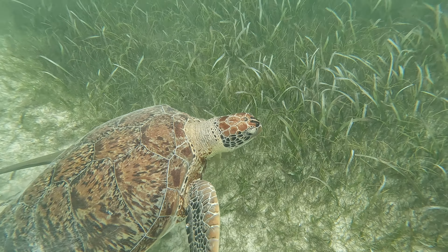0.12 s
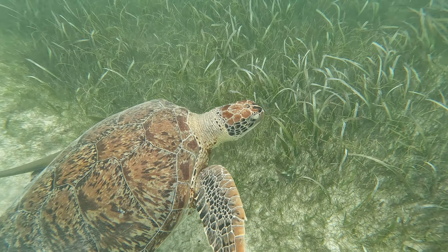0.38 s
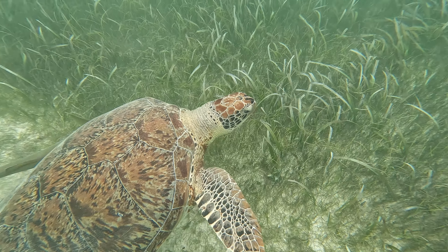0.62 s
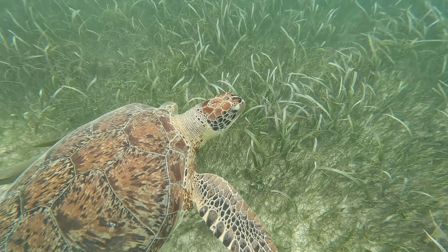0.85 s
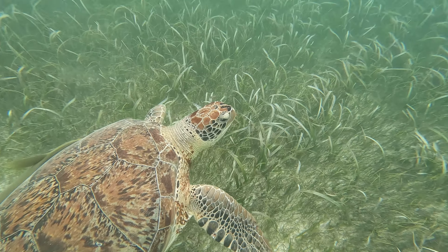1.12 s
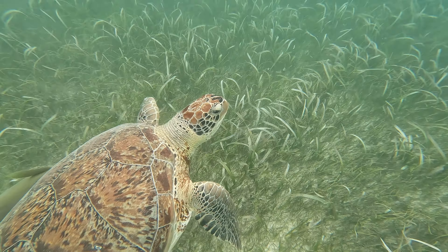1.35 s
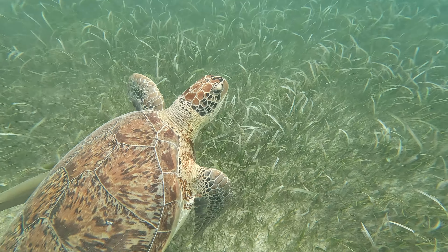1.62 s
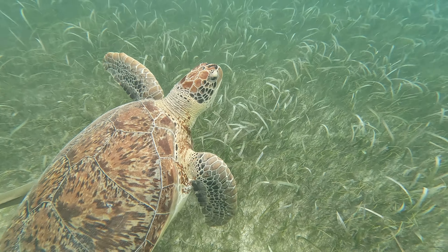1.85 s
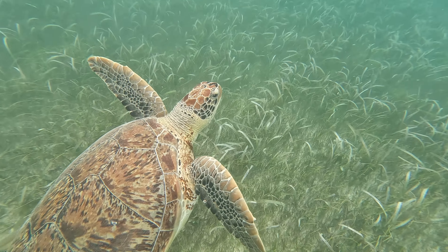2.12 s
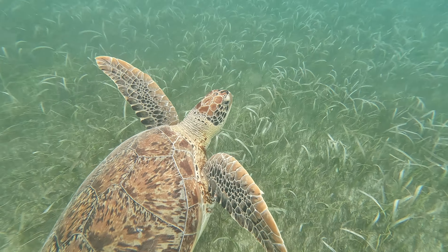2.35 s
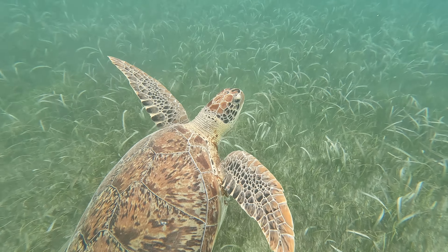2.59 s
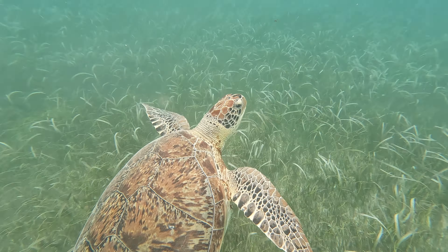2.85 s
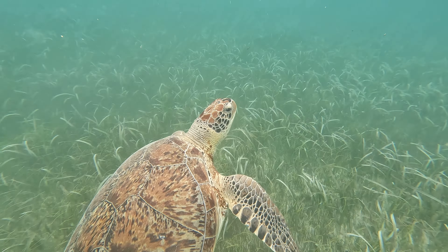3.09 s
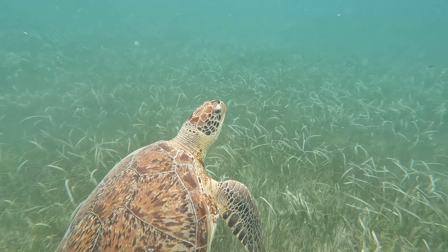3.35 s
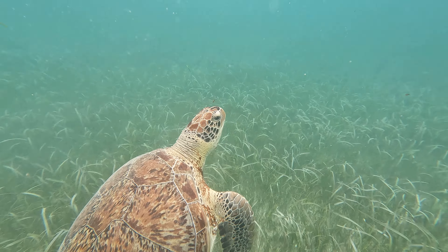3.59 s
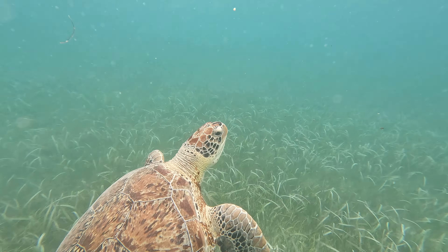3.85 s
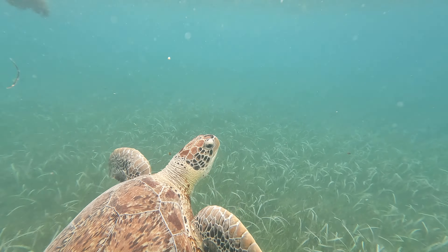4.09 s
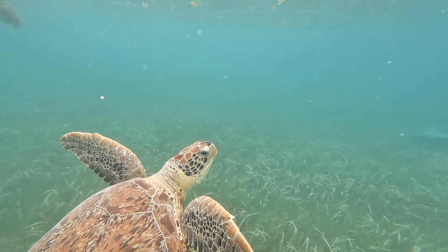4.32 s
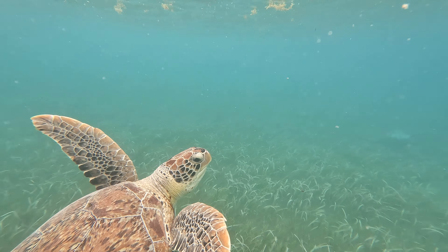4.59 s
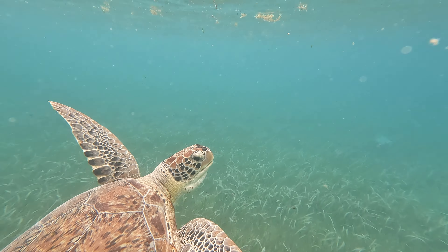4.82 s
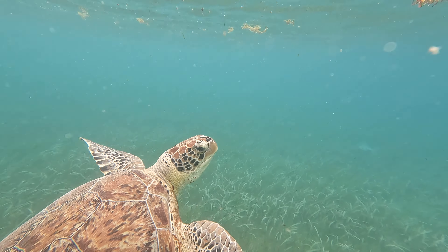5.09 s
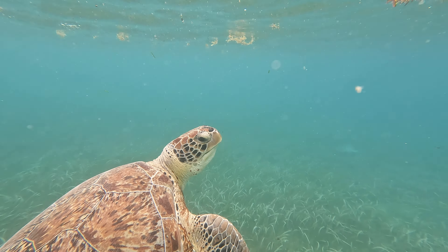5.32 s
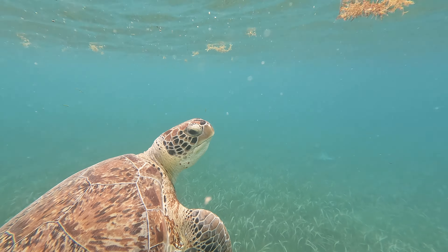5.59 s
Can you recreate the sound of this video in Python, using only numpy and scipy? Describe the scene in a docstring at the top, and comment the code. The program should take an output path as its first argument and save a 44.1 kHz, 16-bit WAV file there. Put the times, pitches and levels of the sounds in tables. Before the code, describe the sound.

Rapid muffled throbs, a short burst of crackling, plopping bubbles and splashy gurgles, then deep throbbing again, heard close and submerged.

```python
"""Bubbles are released underwater in a train of dull thumps: pressure dips that swing back.
A trapped pocket hums near 600 Hz as noise-driven resonance; single bubbles ping as gliding, dying sines.
Splashes, slosh and churn are filtered noise; fine bubbles crackle as random clicks through resonant bands.
From 1.95 s to 3.5 s the stereo image narrows to mono over most of the spectrum and the ticks of the
fine bubbles grow dull."""
import sys
import numpy as np
from scipy import signal
from scipy.fft import rfft, irfft
from scipy.io import wavfile
from scipy.ndimage import uniform_filter1d, map_coordinates

SR = 44100
rng = np.random.default_rng(int(sys.argv[2]) if len(sys.argv) > 2 else 0)


def digitize_waveform(pressure):
    """Quantize a signal to 16-bit integers and store it at the path in sys.argv[1].

    Rows of a 2-D input are taken as channels; values are limited to [-1, 1].
    """
    field = np.atleast_2d(pressure).T
    bounded = np.clip(field, -1, 1)
    quanta = np.round(bounded * 32767).astype(np.int16)
    wavfile.write(sys.argv[1], SR, quanta)


def ratio_of_db(decibels):
    """Turn decibels (scalar or array-like) into linear amplitude factors; 0 dB maps to 1."""
    return 10 ** (np.asarray(decibels, float) / 20)


N = 251370
T = np.arange(N) / SR


def thumps():
    """Pressure release: each thump dips, swings back in a longer, lower hump and excites two damped air modes."""
    # bubble thumps: trough_s, level_db
    thump_rows = [(0.0271, -10.5), (0.131, -17), (0.222, -10.5), (0.323, -7.5), (0.3432, -16.5),
                  (0.436, -13), (0.529, -13.5), (0.6232, -12.5), (0.729, -8), (0.831, -16), (0.851, -10.5),
                  (0.953, -12), (1.0545, -17.5), (1.156, -18.5), (1.7566, -11.5), (1.769, -16),
                  (1.811, -14.5), (2.749, -28), (3.2804, -12), (3.369, -7.5), (3.4286, -18.5),
                  (3.477, -8.5), (3.492, -16), (3.5763, -9), (3.5872, -13), (3.685, -12), (3.7517, -7),
                  (3.7668, -13), (3.866, -9.5), (3.8737, -21.5), (3.988, -7.5), (4.0802, -6.5),
                  (4.1505, -7.5), (4.2581, -9), (4.417, -11), (4.5294, -13), (4.6117, -6.5), (4.7183, -11),
                  (4.927, -7.5), (5.0165, -5), (5.1158, -7), (5.1382, -11.5), (5.254, -10), (5.35, -19),
                  (5.363, -24), (5.3968, -13), (5.429, -20), (5.55, -11.5), (5.664, -17)]
    modes = [(400, 39, -17.0), (590, 150, -30.5)]  # mode_hz, bandwidth_hz, mean_level_db
    out = np.zeros(N + SR)
    u = np.arange(-SR // 50, SR // 20) / SR  # seconds from the trough
    since_knock = np.maximum(u + 0.0017, 0)
    soft = np.convolve(np.hanning(40), np.hanning(40)) / 380
    wide = np.hanning(len(u))
    chances = rng.standard_normal((len(thump_rows), 4))
    for (s, db), (size, tail, *knocks) in zip(thump_rows, chances):
        w = u / (0.004186 * np.exp(0.13 * size))  # time in lengths of the dip; sizes vary at random
        dip = np.abs(np.cos(np.pi * np.clip(w, -.5, .5))) ** .6
        hump_phase = np.clip((w - .5) / (1.7 * np.exp(0.2 * tail)), 0, 1)
        hump = np.abs(np.sin(np.pi * hump_phase)) ** .2  # a low exponent flattens the top
        thump = 0.42 * hump - dip
        for (hz, width_hz, level_db), chance in zip(modes, knocks):
            decay = np.exp(-np.pi * width_hz * since_knock)
            thump = thump - ratio_of_db(level_db + 4 * chance) * decay * np.sin(2 * np.pi * hz * since_knock)
        balanced = thump - wide * thump.sum() / wide.sum()  # the pressure evens out
        out[round(s * SR):][:len(u)] += ratio_of_db(db) * np.convolve(balanced, soft, "same")
    return out[SR // 50:][:N]  # centred on the trough


def pocket(pings):
    """Driven resonance: turbulence excites a trapped air pocket at a moving pitch and a fixed lower mode."""
    # pitch of the trapped pocket: time_s, pitch_hz
    pocket_pitch = [(0, 548), (.45, 600), (1.25, 596), (1.5, 537.4), (2.0, 636.3), (2.9, 628.8), (3.3, 577),
                    (3.8, 582.8), (4.2, 558.7), (5.3, 563.9), (5.7, 494.2)]
    # hum before its random flutter and the bubbles' stirring: time_s, level_db
    hum_level = [(0, -24.5), (.8, -23.5), (1.24, -27.5), (1.3, -41.5), (1.4, -47.5), (1.47, -33.5),
                 (1.68, -27.5), (1.9, -52.5), (2.2, -35), (2.6, -42.5), (3.09, -45), (3.15, -29),
                 (3.82, -25), (3.87, -37), (4.0, -35), (4.04, -25.5), (4.72, -32), (5.04, -22.5),
                 (5.1, -43), (5.15, -25), (5.4, -44.5), (5.7, -29.5)]
    phase = 2 * np.pi * np.cumsum(curves(pocket_pitch, T)[0]) / SR
    low_phase = 2 * np.pi * 478 * T
    t = T[:SR // 8]
    hum = 0
    for turning, width_hz, db in [(phase, 40, 1), (low_phase, 32, -6.5)]:
        stir = rng.standard_normal((2, N)).T @ [1, 1j]
        envelope_filter = t * t * np.exp(-3 * np.pi * width_hz * t)  # steep skirts
        swing = signal.fftconvolve(stir, envelope_filter)[:N]
        hum = hum + ratio_of_db(db) * unit((swing * np.exp(1j * turning)).real)
    # bubbles close to the pocket's pitch set it humming
    near_pings = signal.lfilter(*signal.iirpeak(620, 10, SR), pings)
    near = uniform_filter1d(np.abs(near_pings), size=900)
    strength = ratio_of_db(curves(hum_level, T)[0]) + ratio_of_db(-9) * near
    return strength * ratio_of_db(1.2 * wobble(25)) * unit(hum)


def bubbles():
    """Damped bubble oscillation: each bubble is a dying sine whose pitch slides as it changes size."""
    # single bubbles before eddies disturb level and pitch: start_s, level_db, start_hz, end_hz, t60_s
    bubble_rows = [(.02, -22.5, 178.6, 155, 0.37), (0.673, -15.5, 1520, 1390, 0.057),
                   (1.10, -28, 1580, 1690, 0.054), (1.464, -20.5, 1743, 1940, 0.035),
                   (1.52, -20.5, 1953, 1886, 0.081), (1.648, -23.5, 1453, 1226, 0.12),
                   (1.716, -22.5, 1017, 990, 0.087), (1.734, -11.5, 496, 445, 0.063),
                   (1.791, -26.5, 1295, 1320, 0.14), (1.804, -3.5, 365, 476, 0.035),
                   (1.836, -22, 987, 1035, 0.13), (1.855, -23, 1210, 1270, 0.078),
                   (1.869, -23.5, 1690, 1730, 0.037), (1.944, -23, 1890, 1810, 0.03),
                   (1.95, -29, 300, 365, 0.81), (2.07, -27.5, 450, 503, 0.47),
                   (2.251, -43.5, 4260, 4500, 0.042), (2.301, -16.5, 510, 626, 0.19),
                   (2.32, -11, 625.6, 479, 0.22), (2.45, -11, 656.5, 700, 0.11),
                   (2.678, -7, 359, 400, 0.15), (2.696, -3.5, 626, 578, 0.11),
                   (2.744, -19, 277.2, 516.6, 0.42), (2.806, -20.5, 804, 994, 0.12),
                   (2.812, -20.5, 621, 627, 0.19), (2.864, -5.5, 552, 625, 0.063),
                   (2.883, -4, 610, 652, 0.11), (4.195, -29, 1057, 1020, 0.12),
                   (2.945, -28.5, 463, 540, .15), (4.345, -11.5, 590, 570, 0.19),
                   (4.575, -10.5, 564, 544, 0.15), (4.648, -12, 575.5, 560, 0.18),
                   (2.9, -31.5, 1310, 1330, 0.037), (5.572, -27, 388.7, 498, 0.6),
                   (5.54, -21.5, 1348, 1283, 0.058), (5.666, -9, 385, 478, 0.045)]
    out, t = np.zeros(N + SR), T[:SR // 2]
    eddies = np.pad([wobble(100), wobble(90)], ((0, 0), (0, SR)))  # passing eddies break the tones up
    for k, (s, db, start_hz, end_hz, t60) in enumerate(bubble_rows):
        flutter, waver = eddies[:, k * N // len(bubble_rows):][:, :len(t)]  # each bubble meets its own
        glide = np.minimum(t / (0.42 * t60), 1)
        hz = (start_hz + (end_hz - start_hz) * glide) * (1 + .018 * waver)
        swell_s = min(0.054 * t60, 0.0092)
        swell = 1 - np.exp(-(t / swell_s) ** 2)
        shape = swell * ratio_of_db(db - 60 * t / t60 + 2.2 * flutter)
        out[round(s * SR):][:len(t)] += shape * np.sin(2 * np.pi * np.cumsum(hz) / SR)
    return out[:N]


def splashes():
    """Turbulent noise burst: a splash sets in fast, boils and dies; returns its strength and its sound."""
    # rough splashes: start_s, level_db, decay_ms
    splash_rows = [(1.461, -28.5, 19.5), (1.629, -29.5, 19), (1.728, -36.5, 32), (2.023, -28.5, 32),
                   (2.293, -33.5, 76), (2.42, -30, 81), (2.63, -23, 61.5), (2.808, -35.5, 33),
                   (2.252, -37, 6.9)]
    # relative splash spectrum: frequency_hz, level_db
    splash_colour = [(150, -45), (350, -3), (700, 6.5), (1100, -7.5), (2100, -16.5), (2450, -42.5),
                     (3000, -48), (7000, -110)]
    shape = 0
    for s, db, ms in splash_rows:
        onset = np.clip((T - s) / 0.0019, 0, 1)
        decay = np.exp(-(np.maximum(T - s, 0) / ms * 1000) ** 3)
        shape = shape + ratio_of_db(db) * onset * decay
    boil = ratio_of_db(3.5 * wobble(70)) * grains(1100, spread_db=0.0, bed=0.99)
    return shape, coloured(shape * boil, splash_colour)


def crackle(splashing):
    """Impulse excitation of resonances: fine bubbles, snaps and pips ring filter bands; also returns fizz."""
    # fine bubbles: time_s, level_db
    fizz_level = [(0, -45), (1.2, -46.5), (1.42, -45), (1.46, -35.5), (1.55, -36.5), (1.6, -41.5),
                  (1.8, -39.5), (1.84, -50.5), (2.3, -48.5), (2.41, -59.5), (2.43, -47), (2.47, -41.5),
                  (2.5, -59), (2.6, -54), (2.72, -67.5), (2.85, -74), (2.95, -91.5)]
    # single snaps: time_s, level_db, knock_over_snap_db
    snap_rows = [(0.067, -9, -4.5), (1.2792, 1, -9.5), (1.3293, -8.5, -3.5), (1.4306, -6.5, -3),
                 (1.638, -8, -20), (1.683, -0.5, -20), (1.711, -1.5, -13), (1.764, -4.5, -25),
                 (1.811, -3.5, 4), (1.9981, -7, -2), (2.16, -3.5, 5.5), (2.686, -27.5, 33),
                 (2.748, -43, 34), (5.542, -40, 34.5)]
    # bright ticks of single tiny bubbles: time_s, level_db
    pip_rows = [(0.0404, -20.5), (0.2693, -23), (0.414, -29), (0.6484, -21.5), (0.9995, -20.5),
                (1.9264, -29), (2.1575, -29), (2.297, -40), (2.3306, -41)]
    # relative spectra of resonant body, bright tick and low knock: frequency_hz, level_db
    body_colour = [(650, -21.5), (1100, -13.5), (1150, -15), (1380, -10), (1510, -11), (1890, 0),
                   (2110, -12.5), (2500, -45), (5500, -120)]
    tick_colour = [(1500, -46.5), (2450, -27.5), (2620, -11.5), (2900, 2.5), (3280, -9.5), (3700, -4),
                   (4320, -19.5), (5300, -31), (9000, -90.5)]
    knock_colour = [(300, -30), (650, -2), (1400, -24.5), (2300, -45.5), (5000, -110)]
    # tick of the fine bubbles over their crackle: wide_db, narrow_db
    bright_ends = (-16, -39)
    crackle_db, = curves(fizz_level, T)
    fizz = unit(grains(1200, spread_db=4.5, bed=.7) * ratio_of_db(1.5 * wobble(60) + 1.6 * wobble(18)))
    s, db, knock_db = np.transpose(snap_rows)
    body = coloured(ratio_of_db(crackle_db) * fizz + spikes(s, db), body_colour)
    bursts = ratio_of_db(crackle_db + 1.7 * wobble(14)) + 0.13 * splashing  # splashes stir the fizz
    bursts = bursts * ratio_of_db(narrowed(bright_ends, T))
    bright = fizz + 0.57 * swarm(count=2600, low_hz=2738, high_hz=4600, cycles=6.2)
    singles = spikes(s, db - 34) + spikes(*np.transpose(pip_rows))
    tick = coloured(bursts * bright + singles, tick_colour)
    knock = coloured(spikes(s, db + knock_db), knock_colour)
    return body + tick + knock, fizz, crackle_db


def spray_and_blips(crackle_db):
    """Size-dependent bubble pitch: lively fizz throws the finest bubbles and carries larger ones."""
    # relative spectrum of the finest bubbles: frequency_hz, level_db
    spray_colour = [(3500, -49), (4600, -7.5), (5500, -5.5), (7000, 6), (7800, -5.5), (11000, -89.5)]
    strength = ratio_of_db(1.605 * crackle_db - 9.5) * ratio_of_db(3.7 * wobble(7.5))
    spray = coloured(strength * grains(300, spread_db=3.5, bed=0.82), spray_colour)
    blips = ratio_of_db(1.51 * crackle_db + 16) * swarm(count=950, low_hz=700, high_hz=2300, cycles=12)
    return spray + blips


def gurgle(fizz, gurgle_db):
    """Resonant filtering: grains and small bubbles gurgle with a fluctuating level."""
    # relative gurgle spectrum: frequency_hz, level_db
    gurgle_colour = [(360, -16.5), (620, -7.5), (645, -0.5), (825, -15), (878, -18), (1070, -11),
                     (1160, -21.5), (1370, -15.5), (1430, -16.5), (1590, -42), (1800, -40), (2340, -64.5),
                     (3960, -120)]
    wash = fizz + grains(570, spread_db=3.0, bed=0.71)
    wash = wash + 0.31 * swarm(count=500, low_hz=700, high_hz=1427, cycles=10)
    return ratio_of_db(gurgle_db + 3.2 * wobble(22)) * unit(coloured(wash, gurgle_colour))


def slosh(rumble_db):
    """Low-frequency flow noise: moving water rumbles with a fluctuating level."""
    # relative slosh spectrum: frequency_hz, level_db
    slosh_colour = [(10, 8.5), (30, 12.5), (60, 2.5), (120, -7.5), (900, -120)]
    return ratio_of_db(rumble_db + 3.5 * wobble(25)) * coloured(rng.standard_normal(N), slosh_colour)


def churn(churn_db):
    """Band-shaped turbulence noise: churning water fluctuates in level."""
    # relative churn spectrum: frequency_hz, level_db
    churn_colour = [(60, -27.5), (130, 0), (210, 1.5), (270, -8), (420, -6.5), (520, 0), (1500, -110)]
    return ratio_of_db(churn_db + 3.0 * wobble(18)) * coloured(rng.standard_normal(N), churn_colour)


def faint_ticks(push):
    """Amplitude modulation: faint ticking noise swells with the thumps and varies in level."""
    # relative spectrum of the faint ticks: frequency_hz, level_db
    hiss_colour = [(1000, -41.5), (1600, -7.5), (2100, -2), (2600, -11.5), (3600, -15.5), (8000, -35),
                   (15000, -72.5)]
    swelling = 1 + 8 * ratio_of_db(2.5 * wobble(9)) * uniform_filter1d(np.abs(push), size=900)
    ticks = grains(280, spread_db=3.5, bed=.75) * ratio_of_db(2.5 * wobble(15) + 2.5 * wobble(4))
    return ratio_of_db(-72.5) * swelling * coloured(ticks, hiss_colour)


def stereo(mid):
    """Mid-side stereo: left and right are the mid signal plus and minus a filtered, phase-turned copy."""
    # phase turn from mid to side: frequency_hz, angle_rad
    phase_turn = [(40, 2.9), (170, 2.1), (340, 2), (560, 2.85), (720, 3.14), (860, 4.2), (1080, 4.07),
                  (1550, 4.8), (3000, 5.29), (4500, 5.7)]
    hz, t, z = signal.stft(mid, SR, nperseg=1024)
    # the side copy is full above a corner and falls below it; pairs are (wide image, narrow image)
    corner_hz = np.exp(narrowed(np.log((540, 4500)), t))
    fall_db_per_octave = narrowed((6.5, 42), t)
    least_db = narrowed((-11, -78.5), t)
    octaves = np.log2(np.minimum((hz[:, None] + 1) / corner_hz, 1))
    width = ratio_of_db(np.maximum(fall_db_per_octave * octaves, least_db))
    turned = z * width * np.exp(1j * along(phase_turn, hz))[:, None]
    side = signal.istft(turned, SR, nperseg=1024)[1][:N]
    return np.array([mid + side, mid - side])


def narrowed(ends, t):
    """Linear interpolation: a value moves from its wide-image to its narrow-image end."""
    # how far the stereo image has narrowed: time_s, share (0-1)
    narrowing_share = [(0, 0.06), (1.95, 0.06), (2.3, 0.33), (2.55, 0.42), (3, 0.68), (3.5, 1)]
    return ends[0] + (ends[1] - ends[0]) * np.clip(curves(narrowing_share, t)[0], 0, 1)


def swarm(count, low_hz, high_hz, cycles):
    """Superposition of bubble rings: short sines at random moments, each rising a little in pitch."""
    when, pitch, size = rng.random((count, 3)).T[:, :, None]
    hz, t = low_hz * (high_hz / low_hz) ** pitch, T[:SR // 25]
    life = t * hz / cycles
    glide = 1 + .015 * life
    envelope = ratio_of_db(-12 * size) * np.exp(-life) * (1 - np.exp(-9 * life))
    ring = envelope * np.sin(2 * np.pi * hz * t * glide)
    at = (when * N).astype(int) + np.arange(len(t))
    return unit(np.bincount(at.ravel(), ring.ravel(), N)[:N])


def grains(rate, spread_db, bed):
    """Shot noise: random clicks of uneven size, on average rate a second, on a bed of noise."""
    size = ratio_of_db(spread_db * np.minimum(rng.exponential(size=N), 3.5))
    clicks = unit((rng.random(N) < rate / SR) * size * rng.choice([-1, 1], N))
    return unit(clicks + bed * rng.standard_normal(N))


def spikes(times, db):
    """Impulse excitation: single samples at the given times and levels."""
    return np.bincount(np.round(np.asarray(times) * SR).astype(int), ratio_of_db(db), N)[:N]


def coloured(x, spectrum):
    """Minimum-phase filtering: x takes relative (Hz, dB) gains through a causal, unit-energy kernel."""
    m = 2 ** 13
    gain_db = np.maximum(along(spectrum, np.fft.rfftfreq(m, 1 / SR)), -110)
    cep = irfft(np.log(ratio_of_db(gain_db)))
    # folding the cepstrum onto positive times makes the kernel causal
    cep[1:m // 2] *= 2
    cep[m // 2 + 1:] = 0
    kernel = irfft(np.exp(rfft(cep)))
    return signal.fftconvolve(x, kernel / np.linalg.norm(kernel))[:N]


def wobble(rate):
    """Interpolated noise: a smooth random curve with rate knots a second."""
    return map_coordinates(rng.standard_normal(int(N * rate / SR) + 4), [np.arange(N) * rate / SR])


def unit(x):
    """Power normalisation: x scaled to rms 1."""
    return x / np.sqrt(np.mean(x ** 2) + 1e-20)


def along(points, hz):
    """Logarithmic frequency interpolation of (Hz, value) points."""
    f, v = np.transpose(points)
    return np.interp(np.log(hz + 1), np.log(f + 1), v)


def curves(rows, t):
    """Linear time interpolation: each column after the time, read at times t."""
    s, *cols = np.transpose(rows)
    return [np.interp(t, s, c) for c in cols]


def scene():
    """Linear superposition: all sources add to one pressure signal, which is then spread to stereo."""
    # moving water before random flutter: time_s, rumble_db, churn_db, gurgle_db
    water_level = [(0, -31.5, -40.5, -46.5), (1.2, -24.5, -48.5, -50.5), (1.37, -30.5, -49, -66),
                   (1.5, -24, -42, -40), (1.6, -19.5, -35.5, -38), (1.85, -24, -35.5, -39.5),
                   (2.0, -28, -42.5, -39), (2.6, -32.5, -48.5, -37.5), (2.7, -29, -26, -35.5),
                   (2.9, -34, -63.5, -43), (2.98, -34.5, -45.5, -49), (3.08, -21, -40.5, -50),
                   (3.17, -27, -37.5, -35), (3.5, -35, -34.5, -33), (3.9, -23.5, -36.5, -46),
                   (4.15, -27, -42.5, -37.5), (4.7, -25.5, -30, -35.5), (5.2, -26, -36, -44),
                   (5.7, -26, -30, -35.5)]
    rumble_db, churn_db, gurgle_db = curves(water_level, T)
    push, pings = thumps(), bubbles()
    splashing, splash = splashes()
    crackling, fizz, crackle_db = crackle(splashing)
    air = push + pocket(pings) + pings
    fine_bubbles = crackling + spray_and_blips(crackle_db) + gurgle(fizz, gurgle_db)
    water = splash + slosh(rumble_db) + churn(churn_db)
    return stereo(air + fine_bubbles + water + faint_ticks(push))


def roll_off(x):
    """The treble ends steeply here."""
    return signal.sosfilt(signal.butter(12, 15700, fs=SR, output="sos"), x)


def record(dry):
    """Additive white noise: a faint electronic hiss joins each channel."""
    mix = dry + ratio_of_db(-114) * rng.standard_normal(dry.shape)
    return roll_off(mix)


dry = scene()
out = record(dry)
digitize_waveform(out)
```